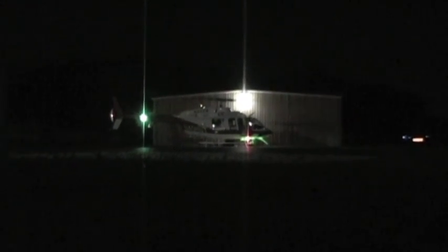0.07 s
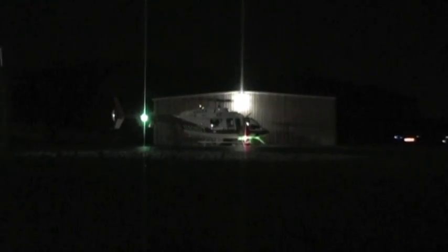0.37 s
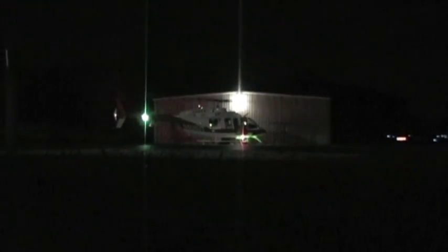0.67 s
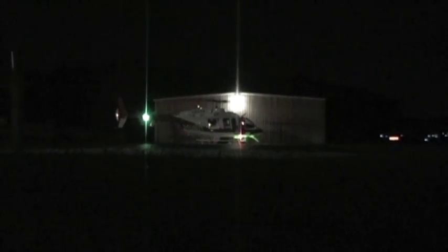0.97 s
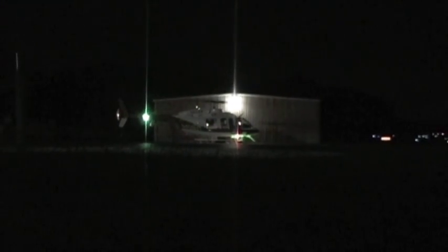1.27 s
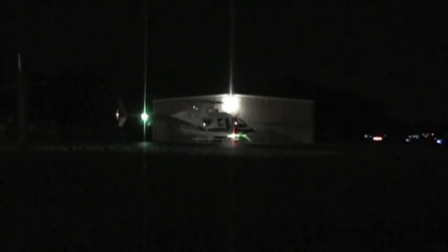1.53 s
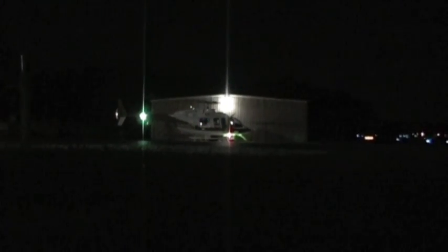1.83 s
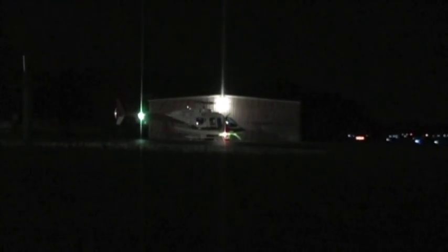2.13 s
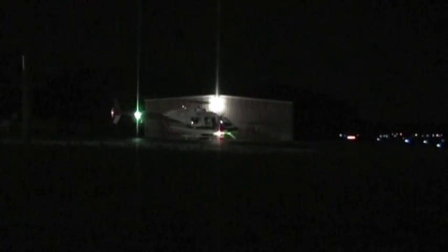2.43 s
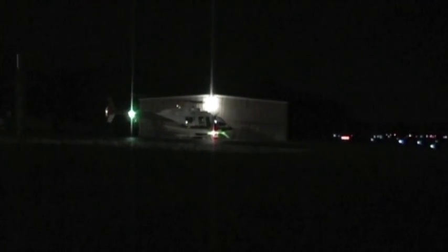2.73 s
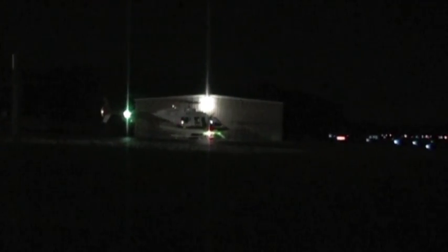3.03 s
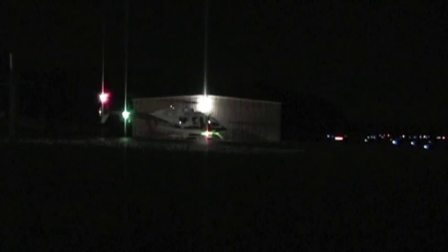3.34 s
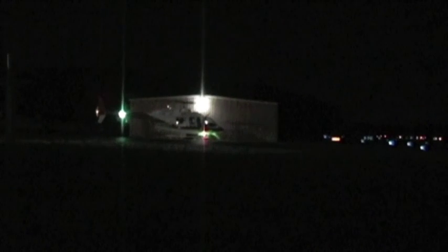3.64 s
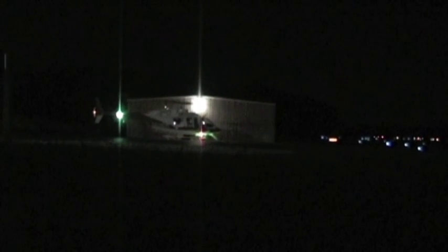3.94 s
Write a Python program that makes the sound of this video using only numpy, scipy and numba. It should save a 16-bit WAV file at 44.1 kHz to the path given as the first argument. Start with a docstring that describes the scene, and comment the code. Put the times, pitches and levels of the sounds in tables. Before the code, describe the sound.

Helicopter turbine roaring and hissing some way off, its rotors throbbing under a faint high whine.

```python
"""A helicopter pad at night, heard some way off across open grass by a small stereo camera.
The turbine exhaust roars and hisses; the roar swells unevenly in brief low lumps, chance peaks of noise.
The tail rotor buzzes and puffs hiss. Each of the four main blades swishes as its tip swings towards
the listener, at times with a crisp tick. Compressor and gears whine thinly behind."""
import sys
import numpy as np
from scipy import signal
from scipy.fft import rfft, irfft
from scipy.io import wavfile
from numba import njit

SR = 44100
rng = np.random.default_rng(int(sys.argv[2]) if len(sys.argv) > 2 else 0)


def pcm_store(signal):
    """Save signal as 16-bit PCM."""
    levels = np.round(np.clip(np.atleast_2d(signal), -1, 1) * 32767)
    wavfile.write(sys.argv[1], SR, levels.astype(np.int16).T)


N = 176400
T = np.arange(N) / SR
BINS_HZ = np.maximum(np.arange(N // 2 + 1) * SR / N, 1)

BLADE_HZ, BLADE_AT_S = 15.8, .038  # main rotor: passage rate, time of one passage
TAIL_HZ, TAIL_AT_S = 47.28, .0167
AIR_CUTOFF_HZ = 12100


def undb(db):
    """Decibels to gain."""
    return 10 ** (np.asarray(db) / 20)


def level(x, rms_db):
    """Set the rms level."""
    return x * undb(rms_db) / np.sqrt(np.mean(x ** 2))


def curve(table, column=1):
    """One column of a time table at every sample."""
    rows = np.array(table, float)
    return np.interp(T, rows[:, 0], rows[:, column])


def across(table):
    """A frequency table at every bin."""
    rows = np.array(table, float)
    return np.interp(np.log(BINS_HZ), np.log(rows[:, 0]), rows[:, 1])


def noise(spectrum):
    """Noise of a given colour."""
    return irfft(rfft(rng.standard_normal(N)) * undb(across(spectrum)), N)


def walk(rate_hz):
    """Smooth random drift, rms 1."""
    smoothing = np.exp(-(BINS_HZ / rate_hz) ** 2) * (BINS_HZ > 1)
    return level(irfft(rfft(rng.standard_normal(N)) * smoothing, N), 0)


def below(x, hz, order=8):
    """Zero-phase low-pass."""
    return irfft(rfft(x) / (1 + (BINS_HZ / hz) ** order), N)


@njit
def svf(x, hz, width_hz):
    """State-variable band-pass with a moving centre."""
    y, band_state, low_state = np.empty(len(x)), 0., 0.
    for i in range(len(x)):
        g = np.tan(np.pi * min(hz[i], .45 * SR) / SR)
        damping = width_hz / hz[i]
        v = (band_state + g * (x[i] - low_state)) / (1 + g * (g + damping))
        band_state, low_state = 2 * v - band_state, low_state + 2 * g * v
        y[i] = damping * v
    return y


def band(hz, width_hz, span=slice(None)):
    """Steep noise band over a span of samples, rms 1; the centre may move."""
    white = rng.standard_normal(N)[span]
    hz = hz * np.ones(len(white))
    return level(svf(svf(white, hz, float(width_hz)), hz, float(width_hz)), 0)


def beat(hz, at_s, lag_cycles=0):
    """Cosine peaking lag_cycles after at_s."""
    return np.cos(2 * np.pi * (hz * (T - at_s) - lag_cycles))


def tone(hz, flicker_db, blur_rad):
    """A tone fluttering through moving air, rms 1."""
    phase = 2 * np.pi * np.cumsum(hz * np.ones(N)) / SR + blur_rad * walk(23)
    return level(np.sin(phase) * undb(flicker_db * walk(26)), 0)


# roar spectrum: freq_hz, relative_density_db
ROAR_SPECTRUM = [(20, -42), (38, -36), (48, -30), (64, -21.5), (82, -30), (100, -14.5), (125, -10),
                 (150, -5.5), (189, 0), (235, -4.5), (268, -7), (310, -9.5), (384, -5.5), (533, -7.5),
                 (689, -14.5), (865, -25), (1200, -36), (1560, -42), (2600, -90)]
# slow drift of the low roar: time_s, bass_gain_db, boom_gain_db
ROAR_GAINS = [(0, 6.5, 2.5), (.9, 2.5, 0.5), (1.55, 0, -0.5), (2.3, 4, -1.5), (2.9, 4, 1), (3.4, 2.5, 2.5),
              (4, 6, 2.5)]


def exhaust_roar():
    """Low exhaust noise, chopped above the bass by both rotors."""
    tail_chop = 1 + .016 * beat(TAIL_HZ, TAIL_AT_S, lag_cycles=.69)
    blade_throb = 1 + .11 * beat(BLADE_HZ, BLADE_AT_S)
    roar = noise(ROAR_SPECTRUM)
    bass, low = below(roar, hz=110), below(roar, hz=236)
    boom = (low - bass) * undb(curve(ROAR_GAINS, column=2))
    chopped = (boom + roar - low) * tail_chop * blade_throb
    return level(bass * undb(curve(ROAR_GAINS)) + chopped, rms_db=-15.5)


# chance peaks of the roar's noise: centre_s, level_db, pitch_hz
ROAR_PEAKS = [(0.013, -6, 210), (0.09, -8, 194), (0.295, -8, 203), (.57, -7, 225), (0.607, -8.5, 457),
              (0.777, -4.5, 213), (1.074, -5, 208), (1.5166, -9, 493), (1.728, -8.5, 206), (1.791, -5, 210),
              (1.975, -8, 223), (2.065, -5.5, 193), (2.1, -8.5, 550), (2.298, -6.5, 223),
              (2.373, -7.5, 176), (2.417, -9, 190), (2.503, -8.5, 224), (2.797, -6, 214),
              (2.992, -7.5, 211), (3.141, -9, 420), (3.468, -5, 208), (3.596, -6, 192), (3.648, -13, 492),
              (3.786, -7, 182)]


def noise_peaks(roar):
    """The boom is held fairly even; chance peaks of noise, a few cycles long, are set at listed times."""
    ceiling_db, peak_gain_db = -9, .5
    swell_cycles, lull_cycles = 1.47, 2.6  # half lengths
    boom = below(roar, hz=275) - below(roar, hz=135)
    excess = np.abs(signal.hilbert(boom)) / undb(ceiling_db)
    limiter_gain = (1 + excess ** 6) ** (-1 / 6)
    out = even = roar + boom * (limiter_gain - 1)
    for (centre_s, db, hz), phase in zip(ROAR_PEAKS, rng.random(len(ROAR_PEAKS))):
        cycles = hz * (T - centre_s)
        lump = undb(db + peak_gain_db) * np.cos(2 * np.pi * (cycles + phase))
        swell = np.exp(-(cycles / swell_cycles) ** 2)
        lull = np.exp(-(cycles / lull_cycles) ** 2)
        out = out + swell * lump - lull * svf(even, hz * np.ones(N), .67 * hz)
    return out


# jet hiss spectrum: freq_hz, relative_density_db
HISS_SPECTRUM = [(500, -20), (1000, -6), (1350, -1.5), (1600, -5), (1850, -1.5), (2700, -4), (3400, -3),
                 (4500, -3.5), (5700, -6.5), (7200, -1.5), (8400, 0), (9500, -0.5), (10300, -6.5),
                 (11300, -11.5), (12300, -20), (13000, -23), (15000, -40), (20000, -70)]
# drift of the jet and inner-blade hiss: time_s, relative_db
HISS_DRIFT = [(0.0, -22), (0.01, -27.5), (0.59, -25.5), (0.63, -30), (1.0, -27.5), (3.69, -28.5),
              (3.97, -28), (4.0, -28.5)]


def exhaust_hiss():
    """Broad jet hiss that drifts with the air."""
    hiss = noise(HISS_SPECTRUM) * undb(curve(HISS_DRIFT) + .5 * walk(3.2))
    blade_throb = 1 + .015 * beat(BLADE_HZ, BLADE_AT_S, lag_cycles=-.32)
    return level(hiss * blade_throb, rms_db=-28.5)


# tail rotor buzz: harmonic, rms_db
TAIL_HARMONICS = [(1, -48.5), (3, -39.5), (4, -29), (5, -27), (6, -41.5), (8, -43.5), (9, -33), (10, -42),
                  (11, -40.5), (13, -37), (14, -43.5)]
# hum at the second harmonic: time_s, rms_db
TAIL_HUM = [(0, -31.5), (.45, -29), (1.05, -37.5), (1.25, -31.5), (1.68, -30), (1.87, -42), (2.35, -52),
            (2.6, -38), (3.15, -40), (3.4, -34), (4, -32)]


def tail_rotor():
    """Wavering harmonics of the blade rate and a puff of hiss from each blade."""
    cycles = TAIL_HZ * T + .017 * walk(1.36)
    buzz = 0
    for harmonic, rms_db in TAIL_HARMONICS:
        partial = np.cos(2 * np.pi * (harmonic * cycles + rng.random()))
        buzz += level(partial * undb(2.6 * walk(1.7)), rms_db)
    puffs = np.exp(4.4 * beat(TAIL_HZ, TAIL_AT_S)) * undb(1.5 * walk(11))
    hum = level(np.cos(2 * np.pi * (2 * cycles + rng.random())), 0) * undb(curve(TAIL_HUM))
    return hum + buzz + level(band(hz=8340, width_hz=1760) * puffs, rms_db=-36.5)


def blades(table, pitch_ratio, beam_sharpness, scatter_db):
    """Each blade's hiss rises in pitch and level as it approaches, then falls away."""
    mach, lead_turns = .6, .0055  # loudest just before the top pitch
    turn_hz = BLADE_HZ / len(table)
    out = 0
    for blade, hz, db in table:
        lag_turns = blade / len(table)
        doppler = (1 - mach) / (1 - mach * beat(turn_hz, BLADE_AT_S, lag_turns))
        beam = np.exp(beam_sharpness * (beat(turn_hz, BLADE_AT_S, lag_turns - lead_turns) - 1))
        hiss = band(hz * pitch_ratio * doppler * (1 + .025 * walk(15)), width_hz=1300)
        out += hiss * beam * undb(db + scatter_db * walk(3.8))
    return out


# tip hiss: blade, nominal_pitch_hz, relative_db
TIP_BANDS = [(0, 11900, -8.5), (1, 11450, -4.5), (2, 10770, -5.5), (3, 10630, -3)]
# tip swish as the air over the disc changes: time_s, pitch_ratio, gain_db
TIP_DRIFT = [(0, 0.76, 4), (.5, 0.88, 6.5), (.7, 0.99, -6), (1.2, 1.05, 3), (1.5, 1, 1), (1.7, 0.94, 4),
             (2, 0.96, -10), (2.3, 1.1, -8), (2.6, 0.7, 5), (3.3, 0.76, 4), (4, 1, -3)]
# inner-blade hiss: blade, nominal_pitch_hz, relative_db
INNER_BANDS = [(0, 9100, -0.5), (1, 8650, -22), (2, 8650, -14.5), (3, 9720, 0)]


def main_rotor():
    """Tip swishes, dulled at the very top by the air, over hiss from further in on each blade."""
    tips = blades(TIP_BANDS, pitch_ratio=curve(TIP_DRIFT), beam_sharpness=14, scatter_db=-.5)
    tips = below(tips * undb(curve(TIP_DRIFT, column=2)), AIR_CUTOFF_HZ, order=24)
    inner = blades(INNER_BANDS, pitch_ratio=.95, beam_sharpness=5.4, scatter_db=2)
    inner *= undb(curve(HISS_DRIFT))
    return level(tips, rms_db=-38.5) + level(inner, rms_db=-36)


# blade tip ticks: centre_s, level_db
TIP_TICKS = [(.662, -32), (.732, -27), (.922, -35), (1.107, -31), (1.171, -28), (1.237, -38), (1.365, -29),
             (1.426, -28), (1.49, -28), (1.612, -33), (1.677, -24), (1.74, -30), (1.868, -27), (1.931, -25),
             (1.995, -25), (2.187, -26), (2.25, -29), (2.503, -34), (3.779, -26.5)]


def tip_ticks():
    """Short rising bursts of hiss as a tip swings into line with the listener, dulled by the air."""
    centre_hz, glide_hz_per_s, half_length_s, gain_db = 10350, 110000, .0042, 1.5
    out = np.zeros(N)
    for centre_s, db in TIP_TICKS:
        near = np.abs(T - centre_s) < .012
        offset_s = T[near] - centre_s
        hiss = band(centre_hz + glide_hz_per_s * offset_s, width_hz=1200, span=near)
        out[near] += hiss * undb(db + gain_db) * np.exp(-(offset_s / half_length_s) ** 2)
    return below(out, AIR_CUTOFF_HZ, order=40)


# whine pitch: time_s, pitch_hz
COMPRESSOR_PITCH = [(0, 9668), (1.8, 9674), (2.4, 9670), (2.85, 9659), (3.3, 9668), (4, 9671)]
# whine level: time_s, rms_db
COMPRESSOR_LEVEL = [(0, -36), (.35, -38), (.85, -40), (1.4, -37.5), (1.85, -38), (2.02, -32.5), (2.1, -38),
                    (2.33, -32.5), (2.5, -39), (2.93, -30), (3.25, -38), (3.6, -40), (3.75, -31.5),
                    (4, -34)]


def compressor():
    """The thin whine of the turbine's compressor."""
    return tone(curve(COMPRESSOR_PITCH), flicker_db=1.8, blur_rad=.4) * undb(curve(COMPRESSOR_LEVEL))


# two strongest gear tones: time_s, lower_tone_db, upper_tone_db
MESH_SWELLS = [(0, -44, -44), (.28, -40, -42), (.65, -44.5, -51), (1.01, -43, -42), (1.1, -43, -52),
               (1.35, -42.5, -51), (1.55, -47, -50), (1.66, -47, -39.5), (1.8, -44, -52), (2.3, -49, -49),
               (2.6, -45, -52), (3.15, -47, -52), (3.5, -48, -47), (3.8, -46, -43), (4, -45, -42)]
# faint gear and shaft tones: pitch_hz, rms_db
GEAR_TONES = [(1141.5, -54), (1611, -56), (1813, -58), (2686, -59), (3223, -52), (4834, -55), (6821, -52)]


def gears():
    """Gear and shaft tones on one wavering speed; the two strongest swell and fade."""
    speed_ratio = 1 + .0003 * walk(2)
    out = 0
    for column, hz in enumerate((3409.5, 4208), start=1):
        rms_db = curve(MESH_SWELLS, column) + .5
        out += tone(hz * speed_ratio, flicker_db=2.2, blur_rad=.2) * undb(rms_db)
    for hz, rms_db in GEAR_TONES:
        out += tone(hz * speed_ratio, flicker_db=2, blur_rad=.3) * undb(rms_db)
    return out


# port balance: freq_hz, left_minus_right_db
MIC_BALANCE = [(60, 6.0), (110, 4.0), (190, 2.0), (350, 0.4), (630, 0.2), (1130, -0.5), (2030, 0.9),
               (3660, 0.1), (6580, -0.5), (11800, -0.5)]
# port phase: freq_hz, left_lead_rad
MIC_PHASE = [(30, -.5), (60, -1.05), (130, -.62), (250, -.56), (330, -.22), (650, -.14), (760, 0),
             (950, .33), (1200, 0), (5500, .04), (6300, .6), (7200, 1.15), (10000, 1.2), (12000, 2.3)]
# port likeness: freq_hz, coherence_ratio
MIC_COHERENCE = [(25, .8), (70, .985), (600, .99), (1400, .999), (2800, .995), (5300, .97), (6000, .85),
                 (9000, .9), (11000, .76), (13000, .55)]


def microphone_ports(x):
    """Two ports: alike in the midrange, shifted and partly unrelated in the bass and treble."""
    scattered = np.real(signal.hilbert(x) * np.exp(2j * np.pi * walk(6)))
    coherence = across(MIC_COHERENCE)
    sign = np.array([[1], [-1]])  # left, right
    mid = rfft(x) * np.sqrt((1 + coherence) / 2)
    side = rfft(scattered) * np.sqrt((1 - coherence) / 2)
    response = undb(sign * across(MIC_BALANCE) / 2) * np.exp(.5j * sign * across(MIC_PHASE))
    return irfft((mid + sign * side) * response, N)


def scene():
    """The running helicopter, heard in stereo from one place."""
    roar = noise_peaks(exhaust_roar() + exhaust_hiss() + tail_rotor())
    return microphone_ports(roar + main_rotor() + tip_ticks() + compressor() + gears())


def record(dry):
    """The camera thins the deep bass and cuts the top."""
    low_cut_hz, top_hz = 58, 15100
    low_pass = signal.ellip(8, .2, 70, top_hz, fs=SR, output="sos")
    return signal.sosfilt(low_pass, dry - .6 * below(dry, low_cut_hz))


dry = scene()
out = record(dry)
pcm_store(out)
```